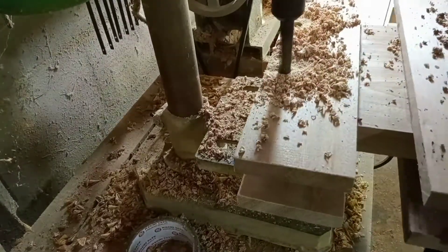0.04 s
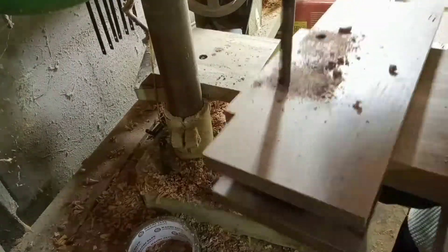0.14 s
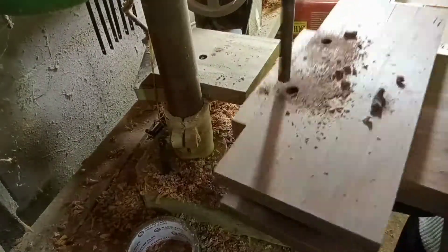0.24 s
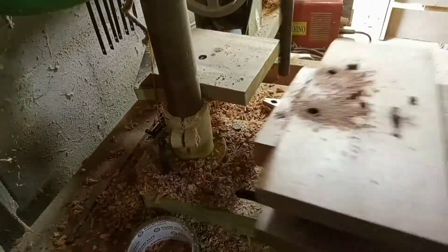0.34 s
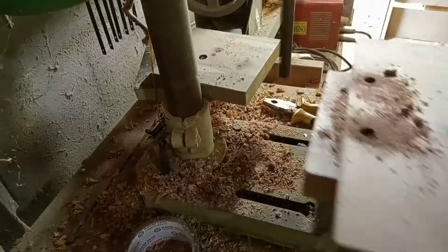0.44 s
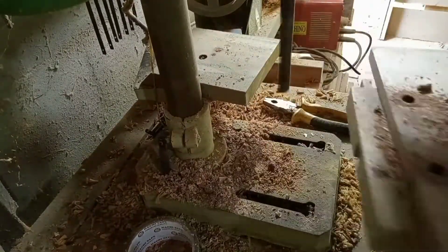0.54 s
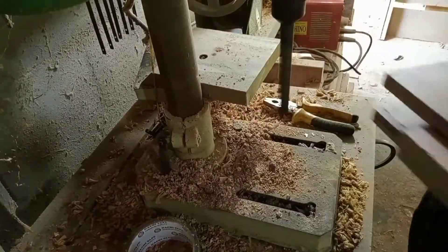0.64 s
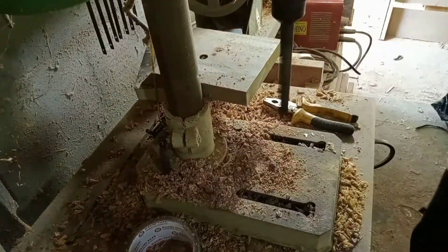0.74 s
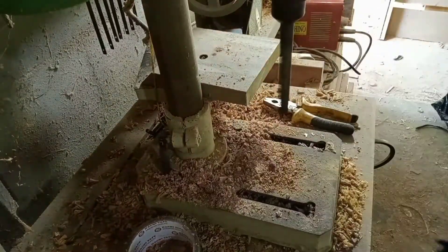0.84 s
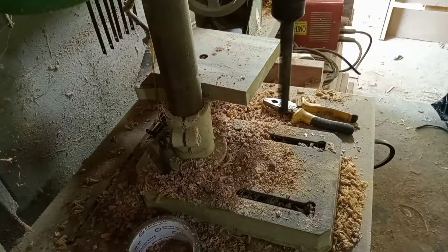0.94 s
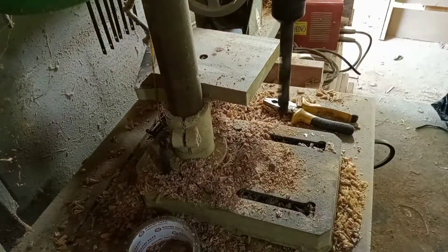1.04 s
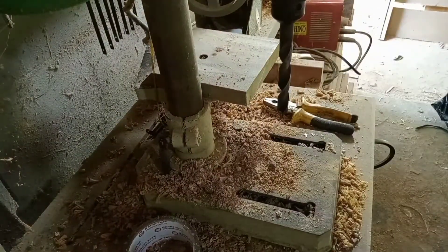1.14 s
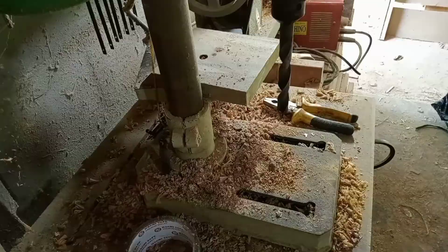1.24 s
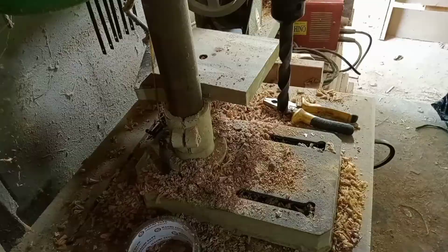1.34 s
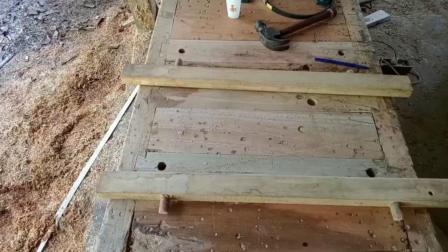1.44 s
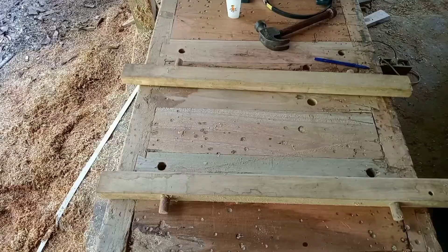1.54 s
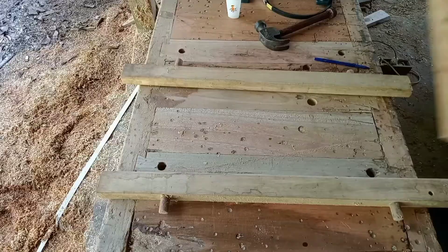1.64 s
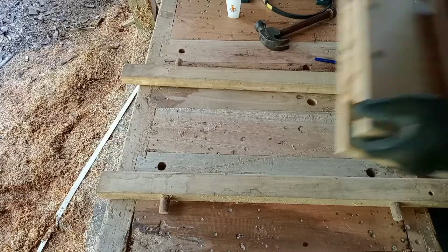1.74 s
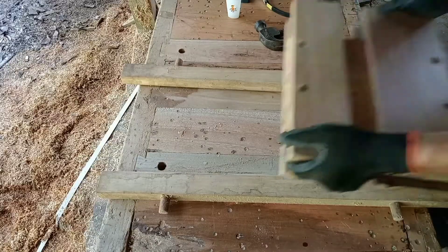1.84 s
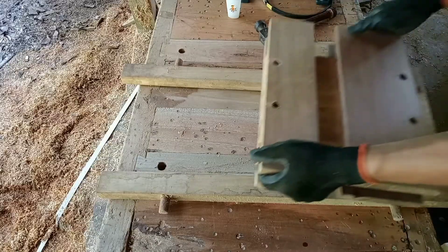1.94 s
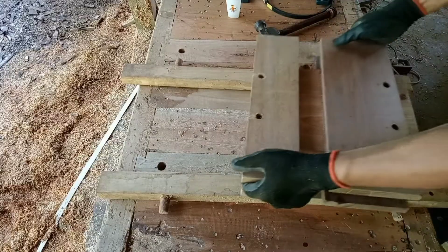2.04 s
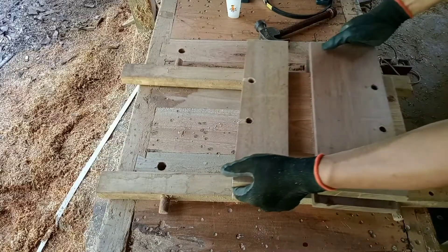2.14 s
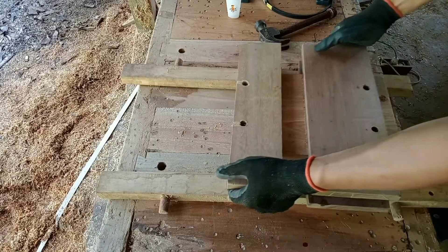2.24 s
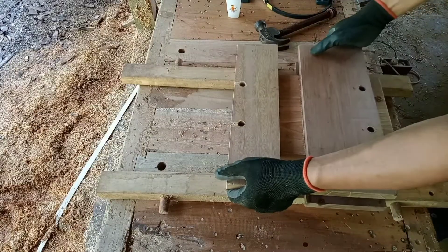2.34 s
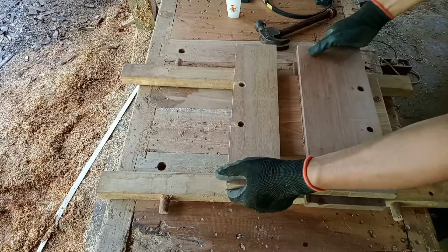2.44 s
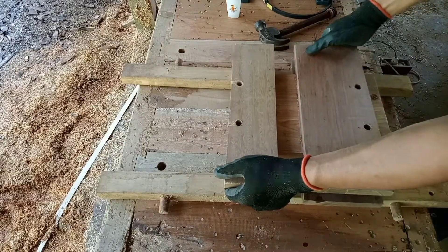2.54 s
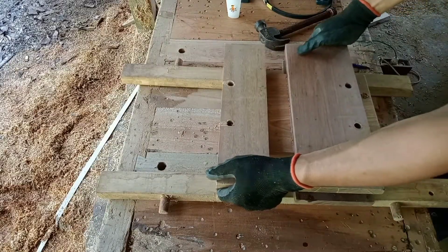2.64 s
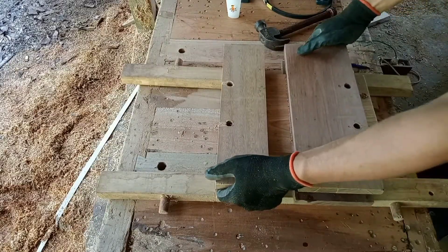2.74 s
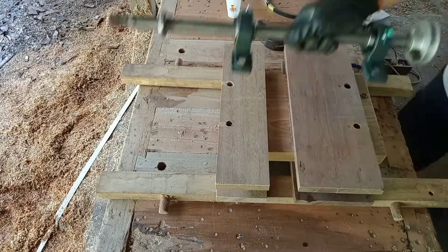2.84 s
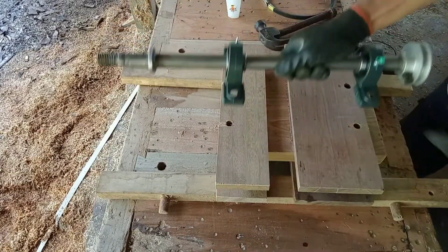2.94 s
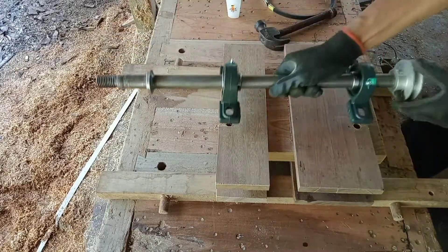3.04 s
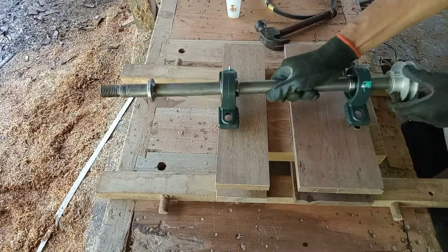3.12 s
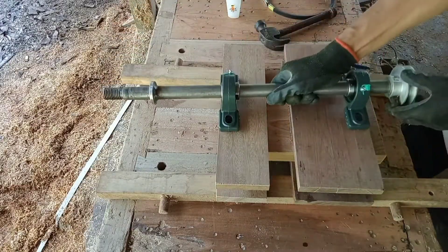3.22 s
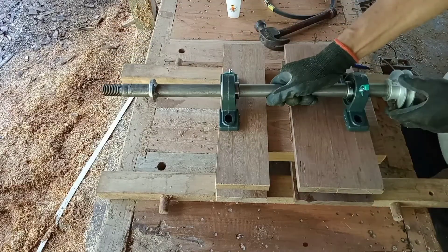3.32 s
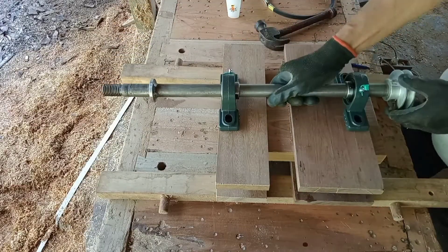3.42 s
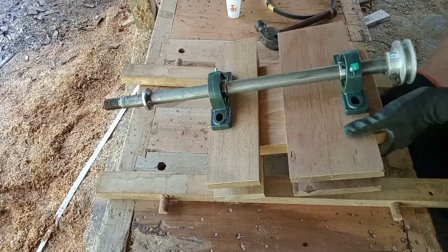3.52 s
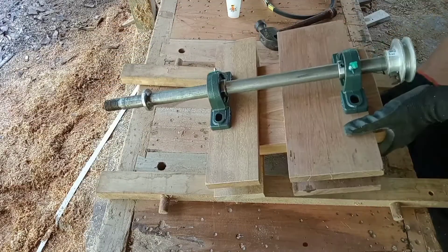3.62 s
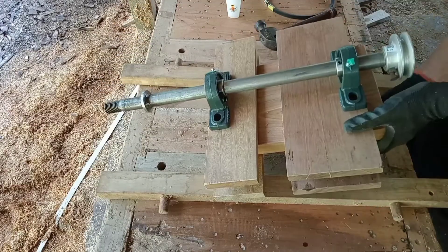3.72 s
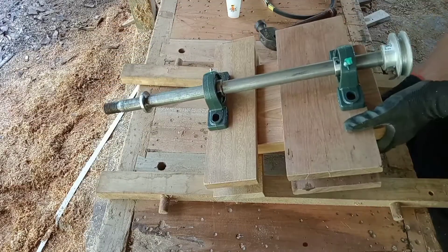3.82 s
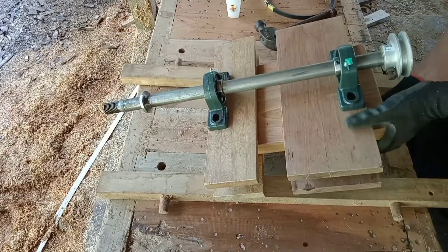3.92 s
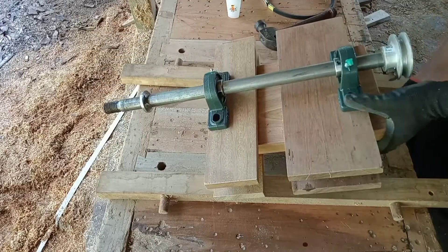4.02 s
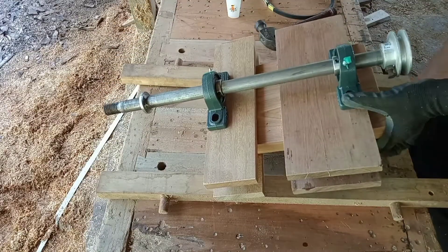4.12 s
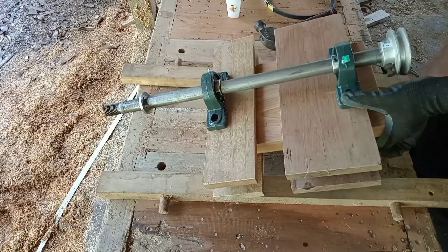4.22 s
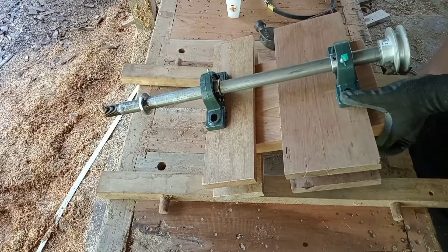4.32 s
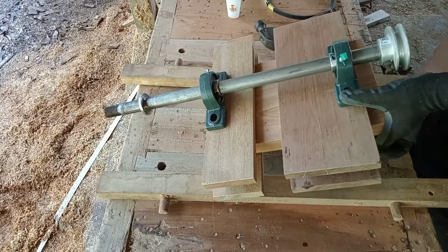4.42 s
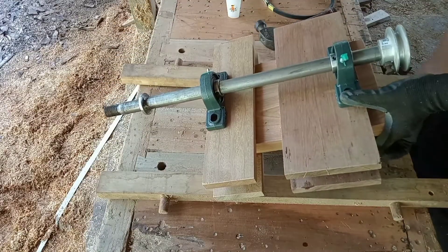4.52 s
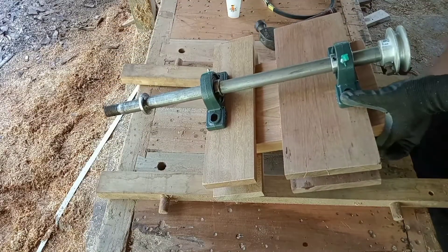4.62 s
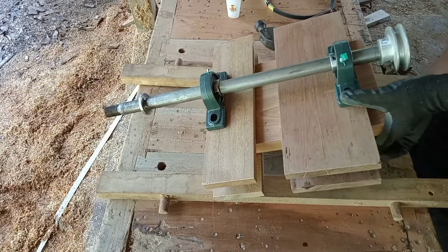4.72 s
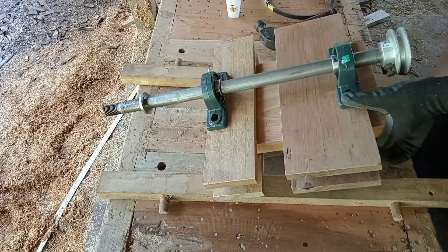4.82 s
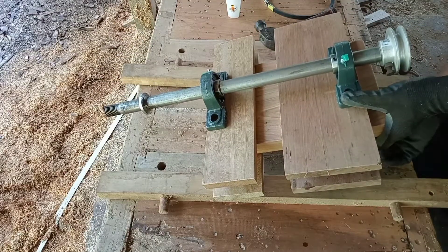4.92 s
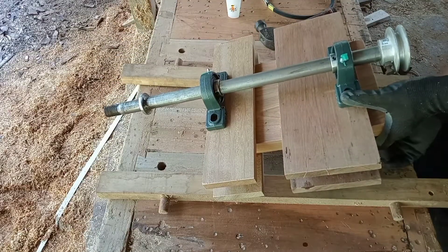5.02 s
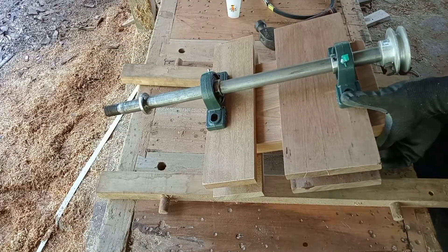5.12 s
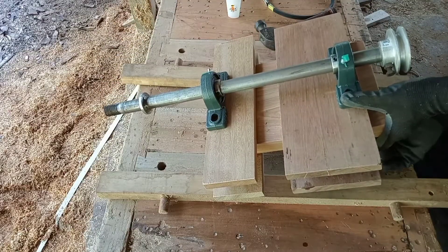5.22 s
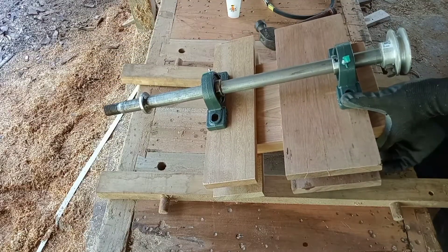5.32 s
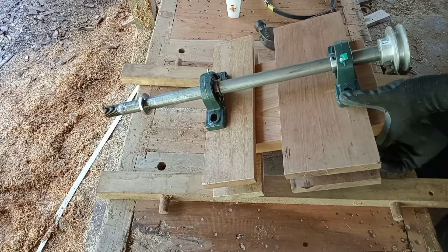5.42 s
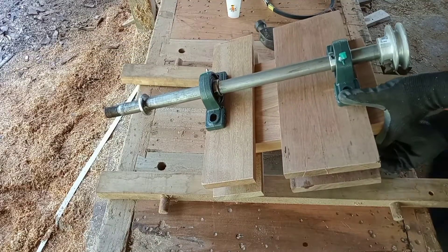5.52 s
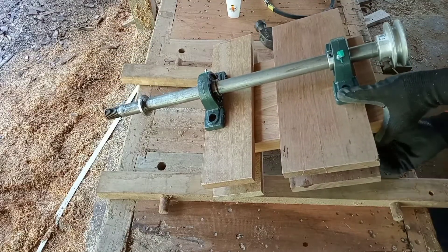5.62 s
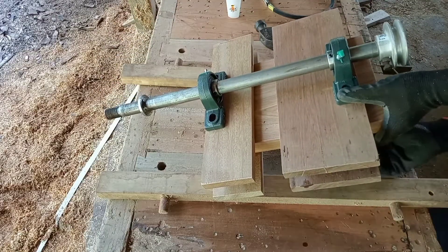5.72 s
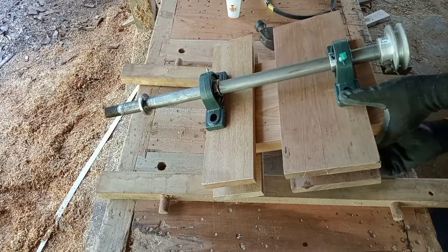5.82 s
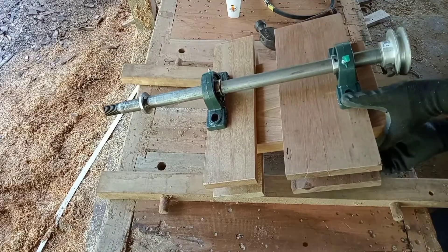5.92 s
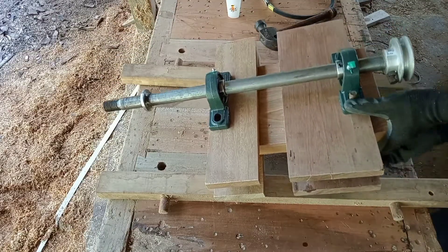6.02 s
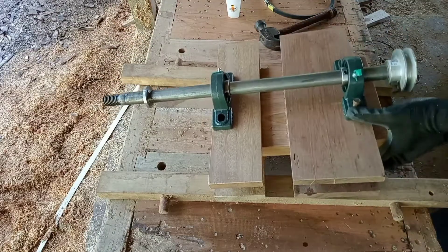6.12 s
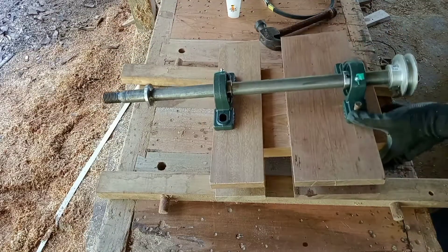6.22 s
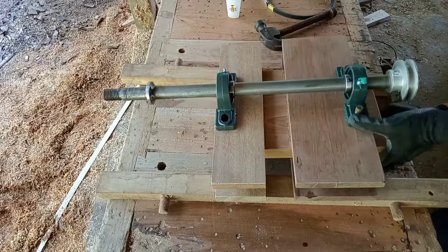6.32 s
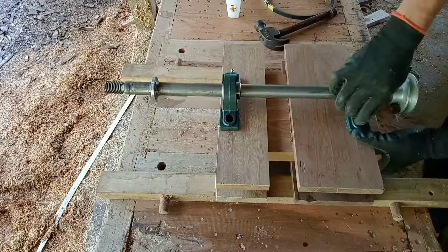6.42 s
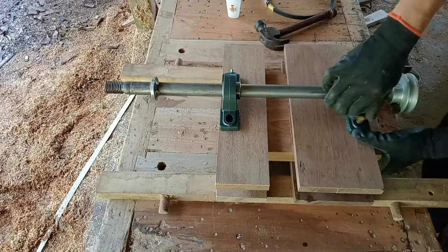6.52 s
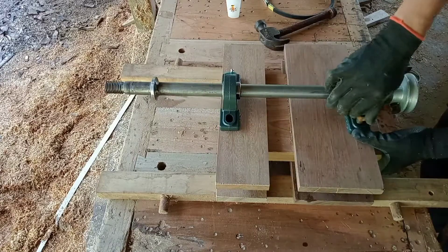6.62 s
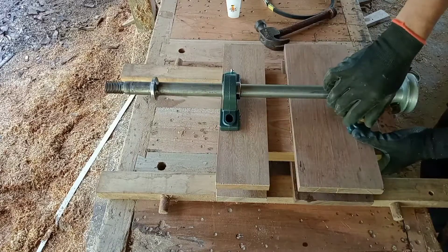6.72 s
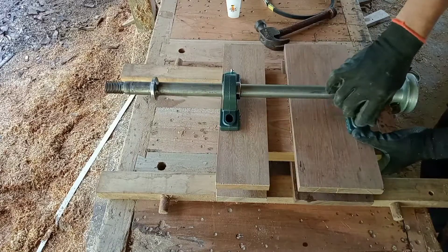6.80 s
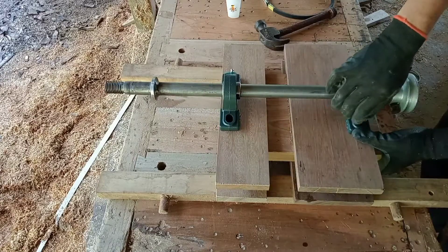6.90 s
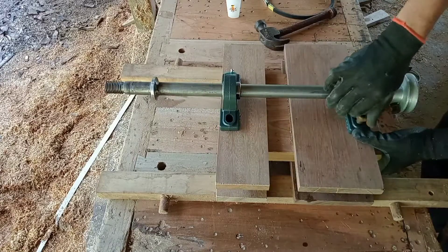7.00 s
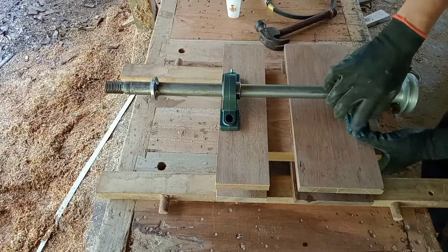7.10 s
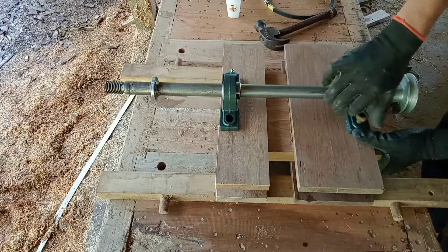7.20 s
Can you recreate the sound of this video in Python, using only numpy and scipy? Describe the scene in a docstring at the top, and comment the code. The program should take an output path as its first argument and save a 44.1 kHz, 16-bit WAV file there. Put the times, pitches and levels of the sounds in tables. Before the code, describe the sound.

From 0 to about 1 s a bench drill press runs very close: strong mid-pitched hum and whine, rough chatter about twenty times a second, crackling ticks and metallic clanks, with sharp clacks near 0.6 and 0.94 s. Its bright rattle, then the low ringing, dies away by 1.1 s. At 1.4 s the open workshop background appears: steady high cicada buzz, quick falling bird chirps about six a second, hiss and faint rumble. Dry scuffs come at 1.5 and 1.9 s, soft board knocks at 2.3-2.4, a slight drag at 2.6. Two firm wood knocks land at 3.25-3.35 s as bearing blocks are set down. A distant engine surges in at 3.5 and wavers to the end; chirps fade, pausing 5.4-6.2. Scrapes and wooden drags cluster at 5.5-6.0 s, strongest near 5.95, then small iron grating nudges continue until 7.25 s. Nearly dry, centered microphone.

```python
"""A bench drill press runs close by: noise and chatter ring its frame, sines whine and flutter, loose parts knock.
Its sound dies away after a second; boards, knocked and dragged, then ring as they are laid on a wooden bench.
Bearing blocks for a steel shaft grate, ring and knock as they shift. From beyond the open workshop come cicadas
(fluttering noise bands), a small bird (falling sines), a far engine (wavering tones over a roar), rumble and hiss.
One microphone position, the same signal in both channels."""
import sys
import numpy as np
from scipy import signal
from scipy.fft import rfft, irfft, next_fast_len
from scipy.io import wavfile
from scipy.ndimage import uniform_filter1d, map_coordinates

SR = 44100
rng = np.random.default_rng(int(sys.argv[2]) if len(sys.argv) > 2 else 0)


def generate_wav(sig):
    """Save sig (samples, or channels by samples) to the path in sys.argv[1] as 16-bit PCM at SR."""
    pcm = np.round(np.clip(np.atleast_2d(sig).T, -1, 1) * 32767).astype(np.int16)
    wavfile.write(sys.argv[1], SR, pcm)


N = 320154
T = np.arange(N) / SR
HZ = np.fft.rfftfreq(N, 1 / SR)

# Broad colour of the running drill. Each row: frequency in Hz, relative level in dB.
DRILL_BODY = [(25, -67), (50, -36), (85, -20), (130, -20), (185, -34), (260, -16), (420, -14.5), (640, -8),
              (1030, -11.5), (1250, -21), (4000, -30), (5200, -39.5), (7500, -45), (10000, -42),
              (15000, -63.5)]
# Resonances of its frame and loose parts. Each row: centre in Hz, width in Hz, relative level in dB.
DRILL_MODES = [(274, 70, -14.5), (586.5, 53, -2.5), (700, 20, -20), (895, 28, 4.5), (1011, 90, -7.5),
               (1500, 50, -15.5), (1603, 67, -14.5), (1978, 120, -19.5), (2493, 210, -14.5),
               (2730, 110, -18), (3150, 85, -27), (3554, 29, -28), (3750, 120, -24), (8680, 160, -29),
               (9470, 380, -34.5)]
# Fluttering whine of the motor, which dies away with the drill. Each row: frequency in Hz, relative level in dB.
WHINE = [(895, -29.5), (715, -44), (578, -44), (1497, -43), (1611, -43), (3745, -53)]
# Two sharp drill resonances that swell and drift. Each row: time in seconds, frequency in Hz, relative level in dB.
MID_RING = [(0, 1500, -46.5), (.35, 1500, -44), (.55, 1523, -29), (.72, 1565, -34.5), (.83, 1570, -30.5),
            (.95, 1500, -58)]
# The upper one, which sinks. Each row: time in seconds, frequency in Hz, relative level in dB.
HIGH_RING = [(0, 2696, -29), (.15, 2670, -37), (.45, 2600, -28.5), (.65, 2570, -40.5), (.85, 2534, -40),
             (1.0, 2440, -28.5), (1.1, 2460, -36)]
# Loose parts knocking on the drill. Each row: start in seconds, relative level in dB, pitch in Hz, decay in seconds.
CLANKS = [(.017, -23, 890, .008), (.118, -28, 250, .01), (.14, -22, 340, .006), (.138, -21.5, 900, .007),
          (.171, -16.5, 885, .01), (.198, -21.5, 890, .006), (.264, -20.5, 890, .005),
          (.291, -20.5, 890, .005), (.314, -20.5, 890, .008), (.368, -20.5, 890, .007),
          (.386, -22, 890, .004), (.421, -20, 900, .004), (.442, -18.5, 890, .005), (.499, -20, 900, .008),
          (.553, -22, 1520, .005), (.597, -21, 600, .003), (.605, -23, 250, .005), (.607, -33, 110, .006),
          (.654, -22.5, 600, .004), (.678, -18.5, 570, .006), (.696, -22, 890, .004), (.79, -23, 580, .005),
          (.823, -22, 890, .004), (.864, -22, 580, .006), (.898, -23.5, 890, .007), (.954, -24, 580, .003),
          (1.003, -20.5, 890, .004), (1.222, -50, 82, .025)]
# Sharp clacks of hard parts. Each row: start in seconds, crack in relative dB, ring in Hz, ring in relative dB,
# decay in seconds.
CLACKS = [(.556, -29, 9200, -33, 0.0055), (.596, -21.5, 2760, -14, 0.0027), (.604, -27, 3400, -34, .004),
          (.937, -24.5, 3350, -26.5, 0.0044)]
# Colour of the crack. Each row: frequency in Hz, relative level in dB.
CLACK_COLOUR = [(100, -26), (600, -6.5), (1500, -10), (2700, 4), (4200, -1), (5500, -16.5), (9500, -13.5),
                (15000, -25)]
# Rumble from outside. Each row: frequency in Hz, relative level in dB.
RUMBLE_COLOUR = [(20, -43), (45, -11.5), (80, 3.5), (140, 6), (200, 6), (300, -13.5), (420, -15),
                 (700, -33), (1500, -36), (4000, -75)]
# Hiss of the open air. Each row: frequency in Hz, relative level in dB.
HISS_COLOUR = [(100, 17.5), (600, 9), (1400, -3), (2200, 2), (2800, 3.5), (3900, 1.5), (4400, -5.5),
               (5500, -14.5), (7500, -17.5), (9700, -11.5), (12000, -22), (15000, -22.5)]
# How loud that hiss stands. Each row: time in seconds, relative level in dB.
HISS_LEVEL = [(1.4, -61.5), (3.5, -59), (5.25, -61), (5.6, -55), (6.3, -59), (6.45, -52.5), (7.26, -55.5)]
# Cicadas. Each row: time in seconds, relative level in dB, loudest partial in Hz.
CICADAS = [(1.37, -46.5, 4810), (2.9, -46.5, 4860), (3.44, -44, 4840), (3.51, -48.5, 4890),
           (4.7, -50.5, 4884), (5.9, -50.5, 4927), (6.25, -52.5, 4825), (7.26, -48, 4910)]
# Partials of their buzz, the fifth loudest. Each row: multiple, width in Hz, relative level in dB.
BUZZ = [(4, 160, -19.5), (5, 235, -0.5), (6, 272.5, -31), (7, 250, -43), (10, 350, -28.5), (11, 400, -56.5),
        (12, 330, -44.5)]
# One downward chirp. Each row: seconds from its middle, frequency in Hz, relative level in dB.
CHIRP = [(-.035, 4043, -19), (-.02, 3800, -12), (-.004, 3370, 0.5), (.012, 2950, -12), (0.029, 2573, -9.5),
         (.05, 2730, -31)]
# The chirps, about six a second, in runs. Each row: middle in seconds, relative level in dB.
CHIRPS = [(1.142, -41.5), (1.312, -41), (1.475, -42.5), (1.64, -43.5), (1.804, -44), (1.97, -42.5),
          (2.145, -45.5), (2.31, -43.5), (2.474, -43.5), (2.638, -45), (2.926, -46), (3.093, -45),
          (3.267, -43), (3.442, -44.5), (3.585, -42), (3.798, -50), (3.971, -53), (4.13, -55), (4.293, -56),
          (4.458, -55), (4.62, -56), (4.78, -57), (4.94, -58), (5.108, -56), (5.27, -56), (5.429, -55),
          (6.261, -59), (6.402, -59), (6.49, -54), (6.65, -54), (6.808, -52), (6.975, -51), (7.134, -51)]
# Gloves and boards scuffing over sawdust. Each row: start, loudest and end in seconds, relative level in dB,
# treble limit in Hz.
SCUFFS = [(1.161, 1.206, 1.23, -56.5, 12000), (1.451, 1.467, 1.505, -42.5, 13150),
          (1.855, 1.922, 1.95, -42, 14000), (1.922, 1.952, 2.005, -39, 14000),
          (1.991, 2.108, 2.15, -57.5, 14000), (2.175, 2.184, 2.28, -49.5, 8100),
          (2.756, 2.875, 2.935, -46, 12900), (4.674, 4.703, 4.73, -56.5, 14000),
          (5.471, 5.488, 5.56, -41, 13000), (5.598, 5.704, 5.78, -49.5, 12500),
          (5.91, 5.992, 6.04, -42.5, 16000)]
# Colour of a scuff. Each row: frequency in Hz, relative level in dB.
SCUFF_COLOUR = [(100, -53), (350, 1.5), (650, 14.5), (1100, 2.5), (1900, 4), (2900, 12), (3900, 2.5),
                (5500, -10), (7500, -13), (9800, -6), (12000, -20), (15000, -17)]
# Broad colour of the wood. Each row: frequency in Hz, relative level in dB.
BOARD_BODY = [(30, -76), (150, -57), (400, 9.5), (1400, -9.5), (2400, -16), (3900, -6.5), (5000, -44),
              (9000, -2), (15000, -10)]
# Boards lying on the bench. Each row: centre in Hz, width in Hz, relative level in dB.
BOARD_MODES = [(171, 23, 1), (346, 30, 14.5), (492, 22.6, 16.5), (527, 19, 9.5), (604, 45, 8.5),
               (922, 17.5, 8), (1006, 56, 7.5), (1233, 65, 2), (1403, 27, 3), (1560, 150, -1),
               (2010, 2200, -6), (2720, 150, -10), (3100, 97, -37), (3720, 81, -52)]
# Boards and bearing blocks set down. Each row: start in seconds, relative level in dB, edge hardness as a treble
# limit in Hz, settling decay of the face in seconds, bench thump of the face in relative dB.
KNOCKS = [(1.630, -49.5, 1070, 0.0073, -22), (2.317, -36, 428, 0.0064, -22), (2.408, -33, 850, 0.0098, 7.5),
          (3.249, -26, 1710, 0.0088, -28), (3.3413, -25.5, 1590, 0.0025, -28),
          (3.603, -40.5, 1200, 0.0043, -16), (5.921, -41, 2900, 0.0049, 9), (5.949, -36.5, 1500, 0.0089, 6)]
# Wood dragged under weight. Each row: start, loudest and end in seconds, relative level in dB,
# hardness as a treble limit in Hz.
DRAGS = [(2.546, 2.637, 2.72, -49, 886), (5.596, 5.706, 5.765, -44, 3800),
         (5.755, 5.774, 5.808, -36.5, 2600), (5.825, 5.855, 5.88, -54, 1500),
         (5.913, 5.922, 5.96, -34, 3200), (5.924, 5.967, 5.985, -26, 2260),
         (5.967, 5.986, 6.035, -33, 2800)]
# Far engine. Each row: time in seconds, firing tone in Hz, relative level in dB.
ENGINE = [(3.5, 181.7, -42.5), (3.62, 180, -43.5), (3.68, 172, -38.5), (3.76, 175, -34.5), (3.82, 177, -42),
          (3.92, 178.5, -39.5), (4.09, 179, -37), (4.22, 177, -39.5), (4.29, 179, -46), (4.38, 179, -42),
          (4.52, 170, -52), (4.6, 176, -46), (4.9, 168, -48), (5.02, 172, -45), (5.15, 172, -40),
          (5.36, 168, -42), (5.44, 172, -50), (5.52, 164, -42.5), (5.66, 160, -44), (5.78, 158, -40),
          (5.88, 152, -52), (6.04, 153, -42), (6.14, 155, -44), (6.25, 159, -38), (6.35, 160, -48),
          (6.45, 168, -40), (6.55, 172, -44), (6.7, 170, -35), (6.79, 158, -39), (6.92, 164, -47),
          (6.99, 177, -36), (7.08, 174, -32.5), (7.2, 169, -37), (7.26, 160, -42)]
# Lower drone that comes and goes beside it. Each row: time in seconds, frequency in Hz, relative level in dB.
LOW_DRONE = [(4.3, 147, -57.5), (4.52, 143, -40), (4.68, 142.6, -50), (4.83, 142, -40), (5.05, 139, -41),
             (5.19, 130, -41), (5.3, 124, -54), (5.95, 128, -54.5), (6.08, 124, -42), (6.3, 113, -46),
             (6.42, 130, -52), (6.6, 140, -44), (6.8, 146, -35), (6.95, 138, -45), (7.12, 140, -41),
             (7.26, 140, -45)]
# Overtones of both. Each row: time in seconds, relative level in dB.
OVERTONES = [(3.5, -63), (5.4, -56.5), (6.25, -52), (6.5, -41), (6.82, -44), (7.0, -54)]
# Colour of the exhaust roar. Each row: frequency in Hz, relative level in dB.
EXHAUST = [(30, -61.5), (70, -16.5), (120, -6), (165, 6), (205, 6), (260, -8), (320, -7), (400, -24),
           (900, -93.5)]
# Iron bearing blocks nudged on the boards. Each row: start, loudest and end in seconds, grating in relative dB,
# ring of the foot in Hz, ring in relative dB, knock on the wood in relative dB.
NUDGES = [(3.812, 3.8155, 3.831, -41.5, 3600, -43.5, -48), (5.476, 5.481, 5.508, -38, 3000, -39.5, -47),
          (5.504, 5.516, 5.535, -42, 2730, -65, -44), (5.658, 5.67, 5.69, -59, 2330, -44, -64),
          (6.003, 6.014, 6.032, -34, 3480, -35, -29.5), (6.498, 6.51, 6.525, -43, 2870, -41.5, -61),
          (6.523, 6.538, 6.556, -42.5, 2950, -48, -63), (6.557, 6.567, 6.592, -44.5, 2820, -50, -45.5),
          (6.704, 6.72, 6.735, -53.5, 2820, -59, -58), (6.762, 6.766, 6.785, -61, 2390, -57, -53.5),
          (6.92, 6.935, 6.955, -49.5, 2860, -56, -59), (7.012, 7.027, 7.06, -44.5, 2780, -47, -54),
          (7.17, 7.188, 7.21, -38, 2815, -44, -59), (7.197, 7.208, 7.228, -46, 3880, -50, -50)]
# Broad colour of the grating iron. Each row: frequency in Hz, relative level in dB.
BLOCK_BODY = [(100, -19), (450, -20), (1100, -12), (3900, -25), (5500, -42), (15000, -48)]
# Blocks and boards ringing together as they grate. Each row: centre in Hz, width in Hz, relative level in dB.
BLOCK_MODES = [(642, 59, 3.5), (1047, 21, -5), (1558, 37, -3), (2226, 110, -6), (2600, 100, -2),
               (2780, 160, 0), (3600, 32, -15), (3990, 23, -4)]
# Reverberation of the workshop. Each row: frequency in Hz, time to fall 60 dB in seconds.
ROOM = [(100, 0.1), (500, 0.17), (1500, 0.026), (4000, 0.08), (12000, 0.091)]

# the drill runs evenly, then dies away ever faster, the bright rattle before the low ringing
DRILL_LOW_DB, DRILL_BRIGHT_DB, RATTLE_SWAY_DB = -26, -29, .5
LOW_FADE_S, BRIGHT_FADE_S = (0.94, 1.116), (0.76, 1.079)  # (fade begins, 20 dB down)
LOW_FADE_POWER, BRIGHT_FADE_POWER = 3.2, 3.4
RING_DRIFT = .02  # share of the pitch
CRACKLE_LOW_HZ, CRACKLE_HIGH_HZ, CRACKLE_WIDTH_HZ = 1900, 3800, 420
CRACKLE_DB, CRACKLES_PER_S, CRACKLE_DRIFT = -37.5, 220, .03  # rate for each pitch; drift as a share of it
CLANK_WIDTH, CLANK_BLUR = .12, .35  # bandwidth of the phase blur as a share of the pitch; its depth in radians
# the outdoors is faint at the drill and opens up at the bench
BENCH_S, OPENING_S = 1.36, 0.017
DROPOUT_S, DROPOUT_LENGTH_S, DROPOUT_DB = 2.775, .006, -15  # a brief dropout in the background
RUMBLE_SWAY_DB = 1.2
CICADA_PULSE_HZ, CICADA_PULSE_DEPTH = 27, .25
BIRD_RASP, BIRD_FLUTTER_DB, BIRD_DIRECT_DB = .045, 3, -3.5  # rasp as a share of the pitch
CHIRP_PITCH_SPREAD, CHIRP_LENGTH_SPREAD = .018, .12
SAWDUST_SPREAD_DB, SAWDUST_CLUMP_DB = 2, 1.5
EDGE_DECAY_S = 0.0059  # an edge lands first; the face follows, softer, and settles
FACE_LAG, FACE_DB, FACE_HARDNESS = 0.594, -0.5, 0.89  # lag as a share of the settling decay
DRAG_THIN_HZ = 328  # a sliding contact stirs the lowest modes less than a blow
SLIPS_PER_S, SLIP_UNEVEN, SLIP_DECAY = 150, .45, .46  # decay as a share of the time between slips
SLIDE, SLIP_SPREAD_DB = .5, 2.3  # SLIDE is the steady rub under the jerks
ENGINE_NEAR_S = 3.48  # here the engine suddenly comes through
SURGE_DB, SURGE_DECAY_S = 13.5, 0.17  # the roar is strongest as it does
ROAR_DB, ROAR_LUMPS_DB = -49.5, 3.5
DRONE_FLUTTER, DRONE_LUMPS = .22, .2
FOOT_WIDTH_HZ = 210
NUDGE_HARDNESS_HZ, NUDGE_DECAY_S, NUDGE_THUMP_DB = 2520, 0.0053, -6
EDGE_HZ = 15500  # upper limit of the microphone's band


def amp(db):
    """Decibels to gain."""
    return 10 ** (np.asarray(db) / 20)


def unit(x):
    """Scales to rms 1."""
    return x / np.sqrt(np.mean(abs(x) ** 2) + 1e-20)


def follow(rows, t=T):
    """Each column of a curve at the times t."""
    s, *columns = np.transpose(rows)
    return [np.interp(t, s, column) for column in columns]


def read(points, hz=HZ):
    """A spectrum's value at hz, on a log axis."""
    f, value = np.transpose(points)
    return np.interp(np.log(hz + 1), np.log(f), value)


def add(mix, s, sound):
    """Mixes a sound in at time s."""
    part = mix[max(round(s * SR), 0):][:len(sound)]
    part += sound[:len(part)]


def wander(rate, t=T):
    """Smooth random curve through normal values drawn rate times a second."""
    knots = rng.standard_normal(16384)
    return map_coordinates(knots, [t * rate], order=2, mode="wrap")


def noise(gain):
    """Noise of rms 1 with the given gain at each frequency."""
    size = next_fast_len(N, real=True)
    spectrum = rfft(rng.standard_normal(size))
    shape = np.interp(np.fft.rfftfreq(size, 1 / SR), HZ, gain)
    return unit(irfft(spectrum * shape, size)[:N])


def response(body, modes=(), size=8192):
    """Causal, minimum-phase impulse response of energy 1 from a broad colour and resonances."""
    hz = np.fft.rfftfreq(size, 1 / SR)
    power = amp(read(body, hz)) ** 2
    for centre, width, db in modes:
        power = power + amp(db) ** 2 / (1 + ((hz - centre) / width) ** 2 * 2) ** 2
    log_gain = np.log(np.r_[power, power[-2:0:-1]]) / 2
    ring = np.fft.ifft(np.exp(np.conj(signal.hilbert(log_gain)))).real[:size // 2]
    return ring / np.linalg.norm(ring)


def through(x, ring):
    """Plays x into an impulse response."""
    return signal.oaconvolve(x, ring)[:len(x)]


def soften(x, hz):
    """A soft contact takes the treble away."""
    return signal.sosfilt(signal.butter(3, min(hz, SR / 2.2), fs=SR, output="sos"), x)


def resonate(x, hz, width):
    """A steep resonance that follows the pitch hz, with rms 1."""
    turn = np.exp(2j * np.pi * np.cumsum(hz * np.ones(len(x))) / SR)
    r = np.exp(-np.pi * width / SR)
    # shift the pitch to zero, smooth there, shift back
    smoothed = signal.lfilter([1], [1, -2 * r, r * r], x / turn)
    return unit((turn * smoothed).real)


def blow(t, decay):
    """Envelope of a short blow: a quick swell, then a fall."""
    return (t / decay) ** .5 * np.exp(1 - t / decay)


def stroke(start, top, end):
    """Pressure of one rub: swells, then lets go."""
    t = np.arange(start, max(end, start + .01), 1 / SR)
    return np.interp(t, [start, top, end], [0, 1, 0]) ** 1.07


def grit(count, spread_db):
    """Friction: noise from tiny slips of uneven size."""
    sizes = np.repeat(rng.standard_normal(count // 32 + 1), repeats=32)[:count]
    return unit(rng.standard_normal(count) * amp(spread_db * sizes))


def slips(count):
    """Stick and slip: grit released in uneven jerks."""
    rate = SLIPS_PER_S * np.exp(SLIP_UNEVEN * wander(SLIPS_PER_S, T[:count]))
    turns = np.cumsum(rate) / SR
    return unit(grit(count, SLIP_SPREAD_DB) * (SLIDE + np.exp(-(turns % 1) / SLIP_DECAY)))


def opens(at, before_db):
    """Gain of a sound that is held back until the time at."""
    return amp(before_db * np.clip(.5 + (at - T) / OPENING_S, 0, 1))


def fade_db(span, power):
    """A fall that gathers speed and passes 20 dB at the end of the span."""
    begin, end = span
    return -20 * np.clip((T - begin) / (end - begin), 0, 2) ** power


def reverb(x, t60s, count=1500):
    """Sparse reflections of random sign, each band dying at its own speed."""
    taps = np.zeros(SR)
    places = 200 + 20 * np.arange(count) + rng.integers(0, 20, count)
    taps[places] = rng.choice([-1., 1.], count)
    hz, t, bands = signal.stft(taps, SR, nperseg=256)
    decay = amp(-60 * t / read(t60s, hz)[:, None])
    tail = signal.istft(bands * decay, SR, nperseg=256)[1]
    return through(x, tail / np.linalg.norm(tail))


def drill(chatter_hz=21.59, rattle_db=-2, rough_db=0.6, shift_db=1.9, flutter=0.42, split_hz=1250, ring_width=90):
    """Bearing noise and a loose quill that chatters, strong then weak, ring the frame; the motor whines."""
    low_fade = fade_db(LOW_FADE_S, LOW_FADE_POWER)
    bright_fade = fade_db(BRIGHT_FADE_S, BRIGHT_FADE_POWER)
    turns = np.cumsum(chatter_hz * (1 + .012 * wander(15))) / SR
    strong = np.exp(-(turns % 1) / 0.26)
    weak = 0.76 * np.exp(-((turns + .5) % 1) / 0.15)
    chatter = unit((strong + weak) * rng.standard_normal(N))
    bearings = rng.standard_normal(N) * amp(rough_db * wander(120))
    drive = bearings + amp(rattle_db) * chatter

    frame = through(drive, response(DRILL_BODY, DRILL_MODES))
    low = signal.sosfiltfilt(signal.butter(6, split_hz, fs=SR, output="sos"), frame)
    ringing = amp(DRILL_LOW_DB + low_fade + shift_db * wander(34.6)) * unit(low)
    rattle = amp(DRILL_BRIGHT_DB + bright_fade + RATTLE_SWAY_DB * wander(25.0)) * unit(frame - low)

    whine = np.zeros(N)
    for hz, db in WHINE:
        whine += amp(db) * np.sqrt(2) * np.sin(2 * np.pi * hz * T + 0.39 * wander(22.84))
    whine *= 1 + flutter * np.cos(4 * np.pi * turns) + 0.21 * wander(23)  # flutters twice a turn
    rings = np.zeros(N)
    for hz, db in (follow(MID_RING), follow(HIGH_RING)):
        drifting_hz = hz * (1 + RING_DRIFT * wander(25))
        rings += amp(db) * resonate(drive * rng.standard_normal(N), drifting_hz, ring_width)
    return ringing + rattle + amp(bright_fade) * (whine + rings)


def crackle(count=7):
    """Small loose parts tick at random through the run, each ringing very briefly at its own drifting pitch."""
    out, t = np.zeros(N), T[T < BENCH_S]
    for hz in np.geomspace(CRACKLE_LOW_HZ, CRACKLE_HIGH_HZ, count):
        ticks = rng.standard_normal(len(t)) * (rng.random(len(t)) < CRACKLES_PER_S / SR)
        drifting_hz = hz * (1 + CRACKLE_DRIFT * wander(17, t))
        add(out, 0, resonate(ticks, drifting_hz, CRACKLE_WIDTH_HZ))
    return amp(CRACKLE_DB + fade_db(BRIGHT_FADE_S, BRIGHT_FADE_POWER)) * out / np.sqrt(count)


def outdoors(rumble_db=-51, rumble_before_db=-12, hiss_before_db=-2):
    """Far traffic rumble and soft hiss: two coloured noises that sway in level."""
    hiss_db, = follow(HISS_LEVEL)
    rumble = amp(rumble_db + RUMBLE_SWAY_DB * wander(8.9)) * noise(amp(read(RUMBLE_COLOUR)))
    hiss = amp(hiss_db + 0.4 * wander(45)) * noise(amp(read(HISS_COLOUR)))
    return rumble * opens(BENCH_S, rumble_before_db) + hiss * opens(BENCH_S, hiss_before_db)


def cicadas(before_db=-18):
    """Many insects buzz at nearly one rate, so each partial is a narrow, fluttering band."""
    level_db, loudest_hz = follow(CICADAS)
    turns = np.cumsum(loudest_hz / 5) / SR  # the loudest partial is the fifth
    out = np.zeros(N)
    for multiple, width, db in BUZZ:
        spread = 1 / (1 + (2 * HZ / width) ** 4)
        angle = 2 * np.pi * round(multiple) * turns
        out += amp(db) * (noise(spread) * np.cos(angle) + noise(spread) * np.sin(angle))
    throb = 1 + CICADA_PULSE_DEPTH * np.sin(2 * np.pi * CICADA_PULSE_HZ * T + wander(5))
    return amp(level_db) * out * throb * opens(BENCH_S, before_db)


def clanks():
    """Short blows on the machine, each ringing one part of it as a tone blurred in phase."""
    out, t = np.zeros(N), np.arange(SR // 4) / SR
    for s, db, hz, decay in CLANKS:
        width = CLANK_WIDTH * hz
        blur = unit(signal.lfilter([1], [1, -np.exp(-np.pi * width / SR)], rng.standard_normal(len(t))))
        blur = unit(soften(blur, width))
        tone = np.sqrt(2) * np.sin(2 * np.pi * hz * t + CLANK_BLUR * blur)
        add(out, s, amp(db) * tone * blow(t, decay))
    return out


def clacks(blur_rate=600):
    """Hard parts meet with a broad crack and a brief, high ring."""
    out, t, colour = np.zeros(N), np.arange(SR // 8) / SR, response(CLACK_COLOUR)
    for s, crack_db, hz, ring_db, decay in CLACKS:
        crack = unit(through(rng.standard_normal(len(t)), colour))
        ring = np.sqrt(2) * np.sin(2 * np.pi * hz * t + wander(blur_rate, t))
        add(out, s, (amp(crack_db) * crack + amp(ring_db) * ring) * blow(t, decay))
    return out


def bird(echo_db=-4, echo_t60=0.34, before_db=-10, count=3):
    """A far bird's falling note, never quite alike, broken up and smeared on paths through trees and walls."""
    paths, t = np.zeros((count, N)), np.arange(CHIRP[0][0], CHIRP[-1][0], 1 / SR)
    for k, (s, db) in enumerate(CHIRPS):
        pitch, length = rng.standard_normal(2)
        hz, shape_db = follow(CHIRP, t * np.exp(CHIRP_LENGTH_SPREAD * length))
        jitter = unit(uniform_filter1d(rng.standard_normal(SR // 4), size=30))[:len(t)]
        hz = hz * (1 + CHIRP_PITCH_SPREAD * pitch + BIRD_RASP * jitter)
        note = amp(db + shape_db) * np.sin(2 * np.pi * np.cumsum(hz) / SR)
        add(paths[k % count], s + t[0], note)  # the chirps take the paths in turn
    paths *= opens(BENCH_S, before_db) * amp(BIRD_FLUTTER_DB * wander(220))
    echoes = sum(reverb(path, [(100, echo_t60), (10000, echo_t60)]) for path in paths)
    return amp(BIRD_DIRECT_DB) * paths.sum(0) + amp(echo_db) * echoes


def scuffs():
    """Dry rubbing: dense, fine sawdust that catches in soft clumps."""
    out, colour = np.zeros(N), response(SCUFF_COLOUR)
    for start, top, end, db, bright_hz in SCUFFS:
        pressure = stroke(start, top, end)
        rub = soften(through(grit(SR // 2, SAWDUST_SPREAD_DB), colour), bright_hz)
        add(out, start, amp(db) * pressure * unit(rub[:len(pressure)]))
    return out * amp(SAWDUST_CLUMP_DB * wander(70))


def contact(wood, hardness_hz, decay, thump_db, click_db=-3, thump_hz=182, thump_decay=0.0018):
    """One contact chatters briefly and rings the boards; a heavy one also shakes the bench top."""
    t = np.arange(SR // 4) / SR
    chatter = rng.standard_normal(len(t)) * np.sqrt(t) * np.exp(-t / decay)
    click = amp(click_db) * np.exp(-decay / 0.0054) * (t == 0)  # the shorter the blow, the stronger its click
    ring = through(soften(chatter / np.linalg.norm(chatter) + click, hardness_hz), wood)
    thump = np.sin(2 * np.pi * thump_hz * t) * t * np.exp(-t / thump_decay)
    knock = ring / np.linalg.norm(ring) + amp(thump_db) * thump / np.linalg.norm(thump)
    return knock * np.sqrt(SR / 100)  # the ring alone would have rms 1 over 10 ms


def boards(edge_thump_db=-18):
    """Knocks land edge first, then flat; drags ring the same boards."""
    out, wood = np.zeros(N), response(BOARD_BODY, BOARD_MODES)
    for s, db, hardness_hz, decay, thump_db in KNOCKS:
        edge = contact(wood, hardness_hz, EDGE_DECAY_S, edge_thump_db)
        face = contact(wood, FACE_HARDNESS * hardness_hz, decay, thump_db)
        settling = amp(FACE_DB) * np.sqrt(decay / EDGE_DECAY_S / 2)  # a longer settling carries more of the blow
        add(out, s, amp(db) * edge)
        add(out, s + FACE_LAG * decay, amp(db) * settling * face)
    thinning = signal.butter(1, DRAG_THIN_HZ, "high", fs=SR, output="sos")
    for start, top, end, db, hardness_hz in DRAGS:
        pressure = stroke(start, top, end)
        jerks = signal.sosfilt(thinning, slips(SR // 2))
        rub = through(soften(jerks, hardness_hz), wood)
        add(out, start, amp(db) * pressure * unit(rub[:len(pressure)]))
    return out


def drone(hz):
    """A low tone that wavers and pulses on its way through the air."""
    angle = 2 * np.pi * np.cumsum(hz) / SR + .3 * wander(16)
    return np.sin(angle) * (1 + DRONE_FLUTTER * wander(28) + DRONE_LUMPS * wander(11))


def engine(tone_db=2, roar_follows=0.47, far_db=-19, before_db=-14, smear=2.6):
    """A far engine revs and eases, its exhaust roaring with it; a lower drone beats against it."""
    (hz, db), (low_hz, low_db), (overtone_db,) = follow(ENGINE), follow(LOW_DRONE), follow(OVERTONES)
    tones = amp(db + tone_db) * drone(hz) + amp(low_db) * drone(low_hz)
    overtones = np.zeros(N)
    for tone_hz, share in ((hz, .85), (low_hz, .45)):
        # an octave above each tone, smeared in phase
        overtones += share * np.sin(4 * np.pi * np.cumsum(tone_hz) / SR + smear * wander(30))
    surge_db = SURGE_DB * (T > ENGINE_NEAR_S) * np.exp(-abs(T - ENGINE_NEAR_S) / SURGE_DECAY_S)
    roar_db = ROAR_DB + surge_db + ROAR_LUMPS_DB * wander(16) + roar_follows * (db - db.mean())
    roar = amp(roar_db) * noise(amp(read(EXHAUST)))
    heard = opens(ENGINE_NEAR_S, far_db) * opens(BENCH_S, before_db)
    return (tones + amp(overtone_db) * overtones + roar) * heard


def blocks():
    """At each nudge an iron foot grates over the board, rings briefly and knocks the wood as it catches."""
    out = np.zeros(N)
    wood, iron = response(BOARD_BODY, BOARD_MODES), response(BLOCK_BODY, BLOCK_MODES)
    for start, top, end, grate_db, ring_hz, ring_db, knock_db in NUDGES:
        pressure, jerks = stroke(start, top, end), slips(SR // 4)
        grate = unit(through(jerks, iron)[:len(pressure)])
        ring = unit(resonate(jerks, ring_hz, FOOT_WIDTH_HZ)[:len(pressure)])
        knock = contact(wood, NUDGE_HARDNESS_HZ, NUDGE_DECAY_S, NUDGE_THUMP_DB)
        add(out, start, pressure * (amp(grate_db) * grate + amp(ring_db) * ring))
        add(out, (start + top) / 2, amp(knock_db) * knock)
    return out


def scene(room_db=-12):
    """Work at the bench in a small, open room, heard from one point."""
    machine = drill() + crackle() + clanks() + clacks()
    near = machine + scuffs() + boards() + blocks()
    dropout = amp(DROPOUT_DB * np.exp(-((T - DROPOUT_S) / DROPOUT_LENGTH_S) ** 2))
    far = (outdoors() + cicadas() + bird() + engine()) * dropout
    mono = near + amp(room_db) * reverb(near, ROOM) + far
    return np.array([mono, mono])


def record(dry, low_cut_hz=48):
    """The microphone sheds the deepest bass; then the band limit."""
    thinned = signal.sosfilt(signal.butter(2, low_cut_hz, "high", fs=SR, output="sos"), dry)
    band_limit = signal.firwin(511, EDGE_HZ, window=("kaiser", 9), fs=SR)
    return signal.oaconvolve(thinned, band_limit[None], "same")


dry = scene()
out = record(dry)
generate_wav(out)
```